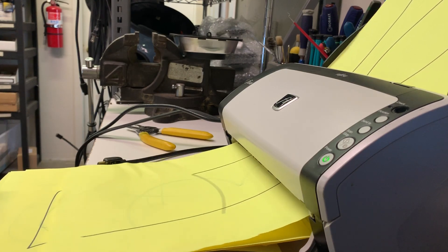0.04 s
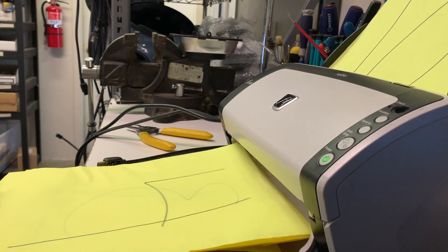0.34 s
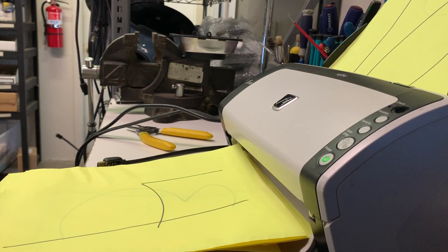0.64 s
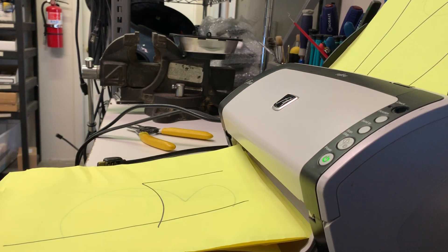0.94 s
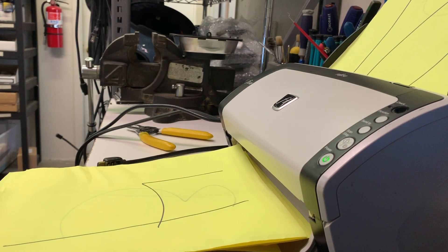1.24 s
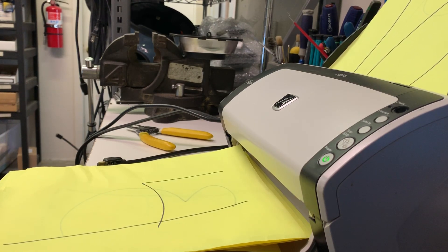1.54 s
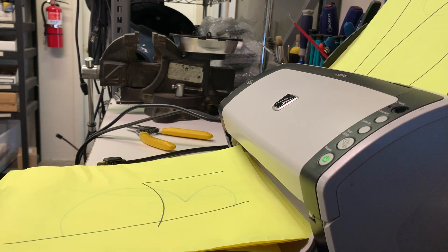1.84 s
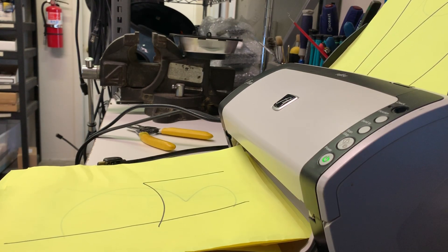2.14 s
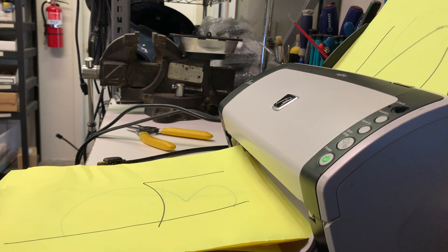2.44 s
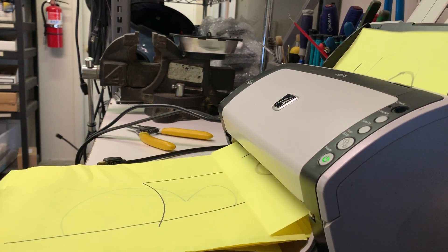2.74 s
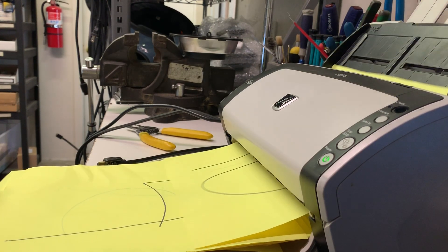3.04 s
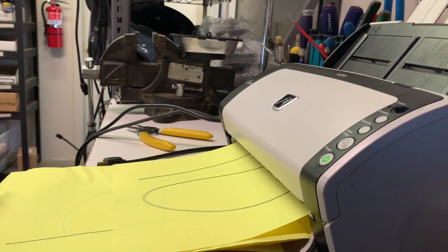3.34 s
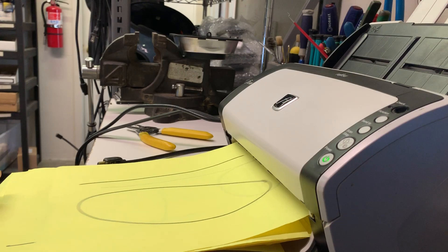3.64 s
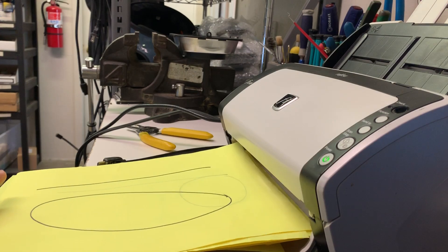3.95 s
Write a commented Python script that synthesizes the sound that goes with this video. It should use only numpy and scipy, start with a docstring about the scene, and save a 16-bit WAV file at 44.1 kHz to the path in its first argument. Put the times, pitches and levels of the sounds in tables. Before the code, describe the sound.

Close by, a document scanner draws paper through with a motor whine and knocking rollers, falls idle, then snaps back into motion and gives a sharp plastic clack. Machines hum softly in the surrounding workshop.

```python
"""Stepper motors whine, gears rattle and paper hisses: a sheet-fed scanner on a workbench, in mono.
The feed stops, leaving a thin driver whine and a faint squeak, then restarts with a latch snap.
Rollers knock and ring the plastic housing; the pick arm clacks down as the last sheet leaves it,
and the empty tray drones. The knocks echo briefly in the workshop, where ventilation rumbles and
machines hum behind the scanner."""
import sys
import numpy as np
from scipy import signal
from scipy.fft import rfft, irfft, next_fast_len
from scipy.io import wavfile
from scipy.ndimage import map_coordinates

SR = 44100
rng = np.random.default_rng(int(sys.argv[2]) if len(sys.argv) > 2 else 0)


def unload_wav(signal):
    """Save mono or channel-first audio to the path in sys.argv[1] as 16-bit WAV at rate SR, clipped to [-1, 1]."""
    wavfile.write(
        sys.argv[1],
        SR,
        np.round(np.clip(np.atleast_2d(signal).T, -1, 1) * 32767).astype(np.int16),
    )


N = 176400
RAMP_S, SHIMMER_DB = 0.019, 1.2  # fade at starts and stops; waver of the running motors' tones


def amp(db):
    """Decibels to gain."""
    return 10 ** (np.asarray(db) / 20)


def unit(x):
    """Scale to rms 1."""
    return x / np.sqrt(np.mean(x ** 2) + 1e-20)


def clock():
    """The time of each sample in seconds."""
    return np.arange(N) / SR


def wobble(rate):
    """A smooth random curve, rate knots a second."""
    return map_coordinates(rng.standard_normal(int(N * rate / SR) + 4), [clock() * rate])


def filtered(x, response):
    """x through a filter whose gain is response(hz)."""
    size = next_fast_len(len(x) + 8192)
    return irfft(rfft(x, size) * response(np.fft.rfftfreq(size, 1 / SR)), size)[:len(x)]


def coloured(x, points):
    """x shaped by (frequency_hz, gain_db) points, at rms 1."""
    hz, db = np.transpose(points)
    return unit(filtered(x, lambda f: amp(np.interp(np.log(f + 1), np.log(hz), db))))


def gate(start, stop):
    """1 from start to stop, with short ramps."""
    return np.clip(np.minimum(clock() - start, stop - clock()) / RAMP_S + .5, 0, 1)


def level(passes, column):
    """Gain from one dB column along each pass of the paper, silent in between."""
    gain = np.zeros(N)
    for points in map(np.array, passes):
        times, db = points[:, 0], points[:, column]
        moving = gate(times[0] - RAMP_S / 2, times[-1] + RAMP_S / 2)
        gain += moving * amp(np.interp(clock(), times, db))
    return gain


def tone(hz, db, waver_db, drift=0):
    """A sine of wavering strength; drift is its phase slip in cycles."""
    strength = np.sqrt(2) * unit(amp(waver_db * wobble(12))) * amp(db)
    return strength * np.sin(2 * np.pi * (hz * clock() + drift + rng.random()))


def grainy(per_s, life_s, share):
    """Noise with a share of its power in short random bursts."""
    hits = (rng.random(N) < per_s / SR) * rng.exponential(size=N)
    power = np.abs(signal.lfilter([1], [1, -np.exp(-1 / (life_s * SR))], hits))
    return rng.standard_normal(N) * np.sqrt(1 - share + share * power / power.mean())


def decay(t, t60_s):
    """A gain that falls 60 dB in t60_s."""
    return amp(-60 * t / t60_s)


def attack(t, rise_s):
    """A gain that rises towards 1 with time constant rise_s."""
    return 1 - np.exp(-t / rise_s)


def mode(t, hz, db, t60_s):
    """One struck resonance: a dying sine of random phase."""
    return amp(db) * decay(t, t60_s) * np.sin(2 * np.pi * (hz * t + rng.random()))


def add(out, start_s, sound):
    """Mix a sound in at start_s."""
    part = out[round(start_s * SR):][:len(sound)]
    part += sound[:len(part)]


def stepper(step_hz, tones, flutter_hz=1.0):
    """Multiples of the step rate, fluttering together under load."""
    drift = np.cumsum(flutter_hz * wobble(40)) / SR
    return sum(tone(k * step_hz, db, SHIMMER_DB, k * drift) for k, db in tones)


def feed_motor(step_hz=635.66):
    """The feed motor sings while it turns; its driver whines while it holds still."""
    # when it turns: start_s, stop_s
    runs = [(-.1, 0.456), (2.175, 3.85)]
    # main whine, at four times the step rate: time_s, level_db
    whine = [(0, -71), (.15, -58), (.22, -72), (.3, -62), (.44, -67), (2.19, -53.5), (2.3, -56.5),
             (2.45, -70), (2.8, -61), (3.1, -71), (3.85, -66)]
    # higher tones: step_multiple, level_db
    overtones = [(8, -78), (9, -77), (14, -78), (15, -74.5), (16, -83), (19, -78.5), (20, -86), (21, -82),
                 (22, -76), (23, -78), (24, -78)]
    # driver at rest: pitch_hz, level_db
    idle_tones = [(5631, -90.5), (8032, -83.5), (10708, -93), (13386, -81)]
    feeding = sum(gate(*run) for run in runs)
    whine_db = np.interp(clock(), *np.transpose(whine))
    turning = stepper(step_hz, [(4, whine_db)] + overtones)
    idle = sum(tone(hz, db, waver_db=2.0) for hz, db in idle_tones)
    return feeding * turning + (1 - feeding) * idle


def pick_motor(step_hz=726.5, waver_db=2.2):
    """A second motor turns briefly and unevenly to reach for the next sheet."""
    # each turn and its loudest tone: start_s, stop_s, step_multiple, level_db
    runs = [(-.1, 0.082, 3, -57.5), (3.899, 4.1, 2, -50.5)]
    # higher tones: step_multiple, level_db
    overtones = [(5, -69), (6, -71), (7, -74)]
    # thin whistle of its driver: pitch_hz, level_db
    driver_tones = [(9964, -76), (13400, -73), (14853, -82)]
    whistle = sum(tone(hz, db, SHIMMER_DB) for hz, db in driver_tones)
    load = unit(amp(waver_db * wobble(70)))
    return sum(gate(start, stop) * (load * stepper(step_hz, [(k, db)] + overtones) + whistle)
               for start, stop, k, db in runs)


def gears(gain_db=1):
    """Loose plastic teeth chatter while the paper moves."""
    # gear train, one list a pass: time_s, relative_db
    passes = [
        [(0, -50), (0.1, -52), (0.18, -46.5), (0.26, -59), (0.44, -58), (0.49, -65)],
        [(2.14, -48.5), (2.2, -47.5), (2.3, -51.5), (2.42, -54), (2.6, -54.5), (2.85, -55), (3.12, -54.5),
         (3.29, -51.5), (3.48, -55.5), (3.7, -51.5), (3.86, -57), (3.93, -52.5), (4.0, -52.5)],
    ]
    # spectrum of the chatter: frequency_hz, gain_db
    colour = [(150, -14), (400, 6), (700, -0.5), (1000, -1), (1350, -0.5), (1800, -10), (2400, -9.5),
              (3500, -20.5), (8000, -59)]
    teeth = grainy(per_s=170, life_s=0.0024, share=0.19)
    return amp(gain_db) * level(passes, 1) * coloured(teeth, colour)


def paper(gain_db=1, surge_db=0.8):
    """The sheet rubs unevenly over the guides, with a fine hiss of fibres on top."""
    # sliding sheet, one list a pass: time_s, rub_relative_db, hiss_relative_db
    passes = [
        [(0, -63, -58), (0.1, -57, -58), (0.17, -55, -54.5), (0.23, -63, -59.5), (0.33, -65.5, -65),
         (0.43, -64.5, -68.0), (0.49, -79.5, -85)],
        [(2.145, -59, -66), (2.21, -54.5, -55), (2.31, -55, -57.0), (2.4, -60, -60.5), (2.5, -58, -59.0),
         (2.65, -59.5, -58.5), (2.76, -53.5, -52), (2.92, -53.0, -55.5), (3.05, -56.5, -57), (3.2, -53.5, -57),
         (3.3, -53.5, -54.5), (3.5, -57, -56), (3.62, -58, -55), (3.72, -55, -54), (3.81, -59.5, -56),
         (3.88, -65, -70.0), (3.95, -66, -73), (4.0, -61, -63)],
    ]
    # spectrum of the rub: frequency_hz, gain_db
    rub_colour = [(1000, -23), (2000, -1.5), (3300, -1), (4500, 2), (5500, -2.5), (7000, -9),
                  (10000, -35.5), (15000, -32)]
    # spectrum of the hiss: frequency_hz, gain_db
    hiss_colour = [(3000, -15), (6000, 0), (8000, -0.5), (10000, -.5), (13000, -1.5), (15500, -5)]
    surge = amp(gain_db + surge_db * wobble(35.15))
    rub = level(passes, 1) * coloured(grainy(per_s=560, life_s=.0015, share=0.29), rub_colour)
    hiss = level(passes, 2) * coloured(grainy(per_s=1400, life_s=.0006, share=0.32), hiss_colour)
    return surge * (rub + hiss)


def knocks(ring_db=-7, scatter_db=2.9):
    """Each knock is a short crack and the ring of the housing; soft contacts are duller."""
    # rollers and pick arm striking: start_s, strength_db, cutoff_hz
    strikes = [(.051, -46.5, 6000), (0.082, -46, 3000), (.17, -40, 4000), (0.194, -47, 5000),
               (.229, -45, 3000), (.381, -52, 5000), (2.147, -32.5, 1200), (2.183, -34.5, 2600),
               (2.228, -42.5, 3000), (2.262, -38, 5000), (2.329, -37, 2500), (3.026, -42, 1980),
               (3.095, -42, 2500), (3.154, -40.5, 2500), (3.333, -40, 7000), (3.336, -33, 7040),
               (3.3406, -26, 6100), (3.344, -27, 13900), (3.348, -30.5, 14000), (3.354, -33, 5000),
               (3.392, -38, 9000), (3.395, -34, 3500), (3.409, -38, 2000), (3.609, -41, 1770),
               (3.671, -46, 1980), (3.752, -42.5, 4000), (3.905, -41, 3950), (3.951, -43, 3000),
               (3.981, -42.5, 9000)]
    # modes of the plastic housing: pitch_hz, gain_db, t60_s
    housing = [(745, -5.5, .05), (903, -5, 0.032), (1374, -4, .05), (1558, 0.5, 0.048), (2050, -6, .05),
               (2612, -6, 0.045), (3560, -9, 0.033), (4150, -7, 0.026), (4580, -1.5, 0.031),
               (5840, -10, 0.025), (7600, -8, 0.02)]
    # spectrum of the crack: frequency_hz, gain_db
    colour = [(200, -5), (800, -1.5), (1200, 2), (1550, -0.5), (2200, -0.5), (4500, -2), (7000, -6.5),
              (8500, -10), (13000, -8), (16000, -13)]
    out, t = np.zeros(N), np.arange(SR // 5) / SR
    for start_s, db, cutoff_hz in strikes:
        ring = sum(mode(t, hz, gain_db + rng.normal(0, scatter_db), t60) for hz, gain_db, t60 in housing)
        crack = coloured(rng.standard_normal(len(t)), colour) * decay(t, t60_s=0.038)
        knock = (crack + amp(ring_db) * ring) * attack(t, rise_s=0.0002)
        lowpass = signal.butter(2, cutoff_hz, fs=SR)
        add(out, start_s, amp(db) * signal.lfilter(*lowpass, knock))
    return out


def ticks(relative_width=0.31):
    """Small parts snap with one broad, quickly damped resonance."""
    # rollers and paper edge: start_s, level_db, centre_hz
    snaps = [(.584, -59.5, 12700), (1.781, -59, 4000), (1.803, -64, 3970), (1.934, -61, 4000),
             (2.049, -63, 4300), (2.069, -61, 4000), (2.348, -44, 4370), (2.887, -46, 4560),
             (3.748, -39.5, 4670), (3.753, -44, 4800), (3.788, -53, 4600), (3.932, -52, 4180),
             (3.979, -41, 3660), (3.984, -47, 3760)]
    out, t = np.zeros(N), np.arange(SR // 10) / SR
    for start_s, db, hz in snaps:
        def resonance(f):
            damping = 1j * f * hz * relative_width
            return (damping / (hz ** 2 - f ** 2 + damping)) ** 2
        snap = unit(filtered(rng.standard_normal(len(t)), resonance))
        add(out, start_s, amp(db) * snap * attack(t, rise_s=0.00024) * decay(t, t60_s=0.032))
    return out


def latch(start_s=2.1305, gain_db=-33.5, crack_db=-11):
    """A small hard catch snaps as feeding resumes: one crack and a few short modes."""
    # modes of the catch: pitch_hz, gain_db, t60_s
    modes = [(3560, -10, .015), (4420, -1, .018), (4620, 2, .018), (5000, -5, .014), (5540, -4, .016),
             (6250, -8, .014)]
    out, t = np.zeros(N), np.arange(SR // 10) / SR
    ring = sum(mode(t, *row) for row in modes)
    crack = amp(crack_db) * decay(t, t60_s=0.013) * rng.standard_normal(len(t))
    add(out, start_s, amp(gain_db) * (ring + crack) * attack(t, rise_s=0.0004))
    return out


def thumps():
    """The heaviest jolts shake the case and the bench."""
    # the case jolting: start_s, level_db
    jolts = [(2.146, -31.5), (3.344, -33)]
    # spectrum of case and bench: frequency_hz, gain_db
    colour = [(60, -10), (130, 3), (205, 6), (300, -3), (480, -10), (720, -7.5), (1000, -28), (3000, -55)]
    out, t = np.zeros(N), np.arange(SR // 4) / SR
    for start_s, db in jolts:
        boom = coloured(rng.standard_normal(len(t)), colour)
        add(out, start_s, amp(db) * boom * attack(t, rise_s=0.001) * decay(t, t60_s=0.19))
    return out


def tray(start_s=3.345):
    """With no sheet left to damp it, the input tray drones softly after the clack."""
    drone = tone(hz=207, db=-49.5, waver_db=3, drift=0.14 * wobble(16))
    return gate(start_s, N / SR + RAMP_S) * drone


def squeak(jitter_hz=12, third_db=-3):
    """In the pause, a faint thin tone with its third harmonic rises and falls."""
    # course of the squeak: time_s, pitch_hz, level_db
    glide = [(1.08, 3780, -105), (1.15, 3830, -76), (1.21, 3940, -82), (1.25, 3940, -94), (1.31, 4150, -81),
             (1.37, 4260, -82), (1.43, 4160, -83), (1.5, 3820, -95)]
    times, hz, db = np.transpose(glide)
    pitch_hz = np.interp(clock(), times, hz) + jitter_hz * wobble(60)
    phase = 2 * np.pi * np.cumsum(pitch_hz) / SR
    envelope = gate(times[0], times[-1]) * amp(np.interp(clock(), times, db))
    return envelope * (np.sin(phase) + amp(third_db) * np.sin(3 * phase))


def room(x, gain_db=-11, delay_s=0.004):
    """The short echo of a cluttered workshop, arriving just behind the direct sound."""
    t = np.arange(SR // 3) / SR
    tail = rng.standard_normal(len(t)) * decay(t, t60_s=0.21) * (t > delay_s)
    return amp(gain_db) * signal.fftconvolve(x, tail / np.linalg.norm(tail))[:N]


def workshop(air_db=-34.5):
    """Room tone behind the bench: ventilation rumble and the hum of machines."""
    # spectrum of the ventilation: frequency_hz, gain_db
    air = [(12, 2.5), (30, 0.5), (45, -1.5), (62, -7.5), (85, -12), (105, -15.5), (150, -14.5),
           (200, -20.5), (310, -20), (370, -19.5), (410, -17), (440, -26), (530, -29), (615, -25),
           (700, -34), (1000, -38), (1600, -46), (2700, -46), (3200, -52), (4700, -59), (7000, -62),
           (12000, -65), (14000, -63), (15500, -68)]
    # machine hum: pitch_hz, level_db, waver_db
    hum = [(28.8, -45, 1.5), (46.5, -42.5, -4.5), (82, -52, 3.5), (120, -39.5, .5), (204.1, -59.5, -5),
           (256.1, -57, 4), (397, -60.5, -2.5), (469.6, -45, -0.32), (1866, -83, 1), (2425, -75.5, -2),
           (2815, -75.5, 2)]
    rumble = amp(air_db) * coloured(rng.standard_normal(N), air)
    return rumble + sum(tone(*row) for row in hum)


def scene():
    """The scanner on its bench in front, the workshop behind, at one microphone."""
    contacts = knocks() + ticks() + latch() + thumps()
    running = feed_motor() + pick_motor() + gears() + paper() + tray() + squeak()
    return (workshop() + running + contacts + room(contacts))[None]


def record(dry):
    """The microphone keeps nothing above its band limit."""
    top_hz = 15730
    return filtered(dry[0], lambda hz: hz < top_hz)[None]


dry = scene()
out = record(dry)
unload_wav(out)
```